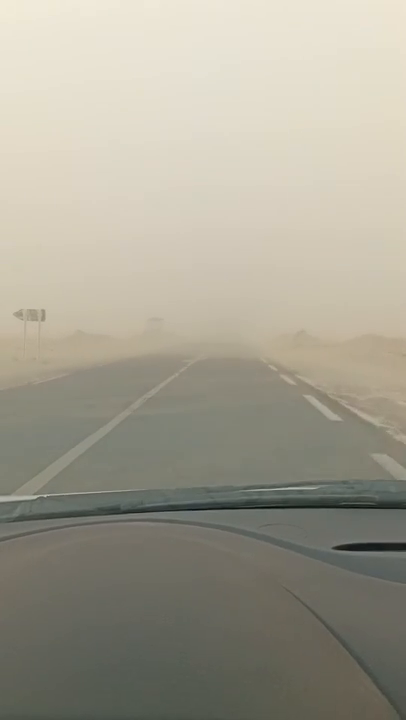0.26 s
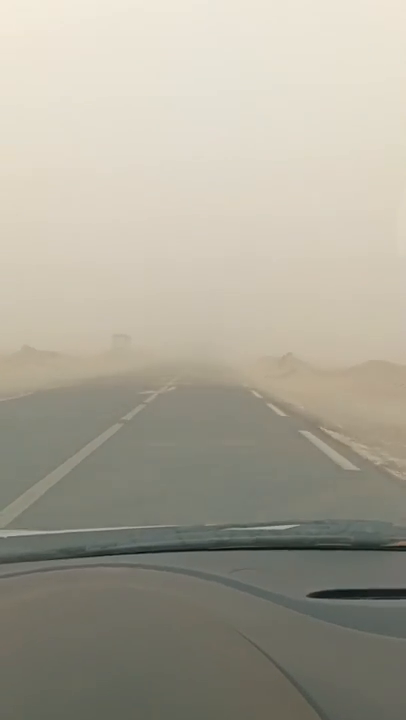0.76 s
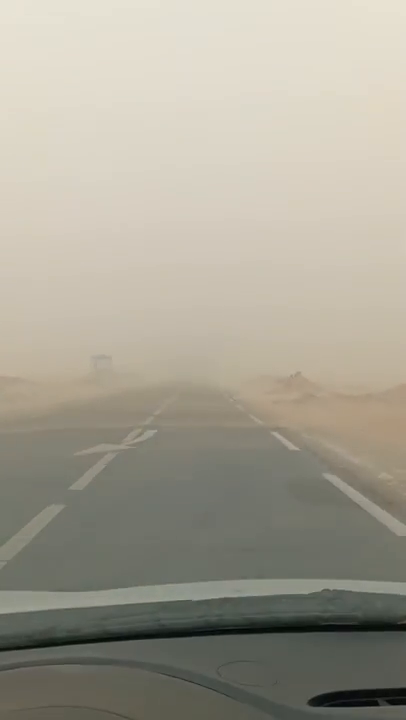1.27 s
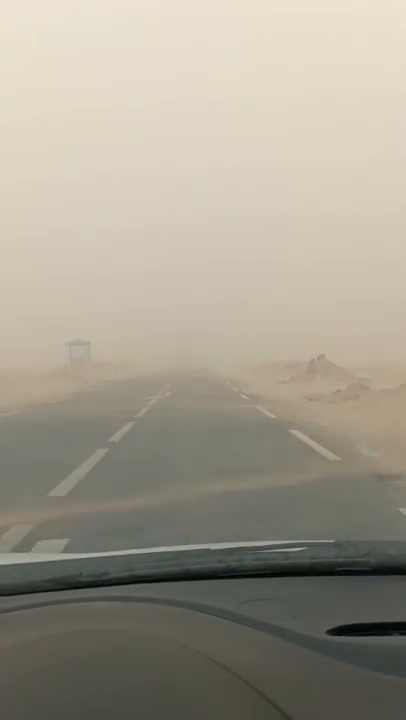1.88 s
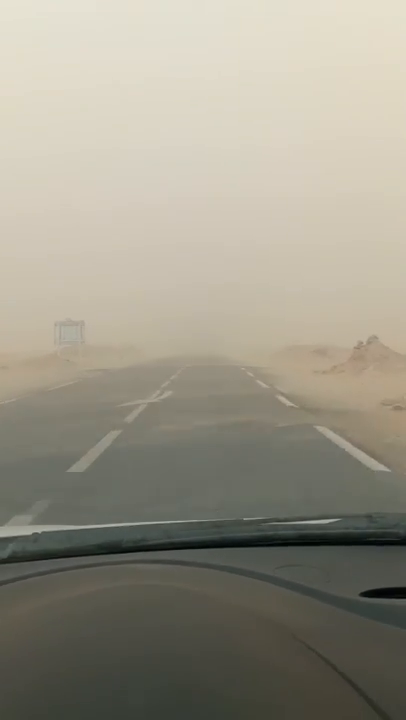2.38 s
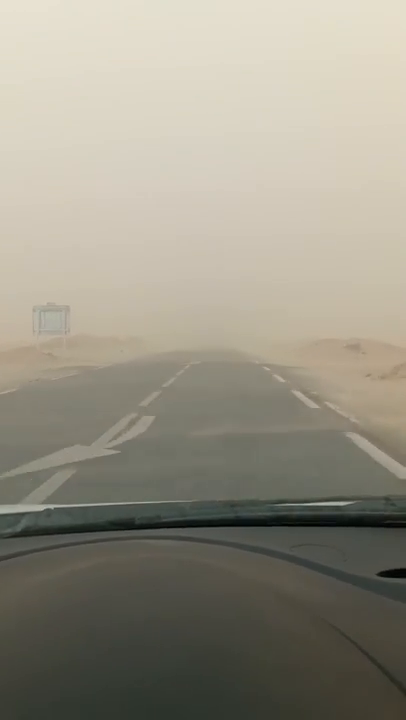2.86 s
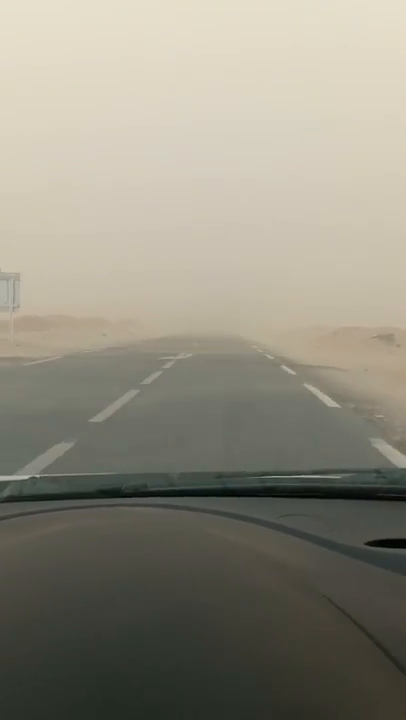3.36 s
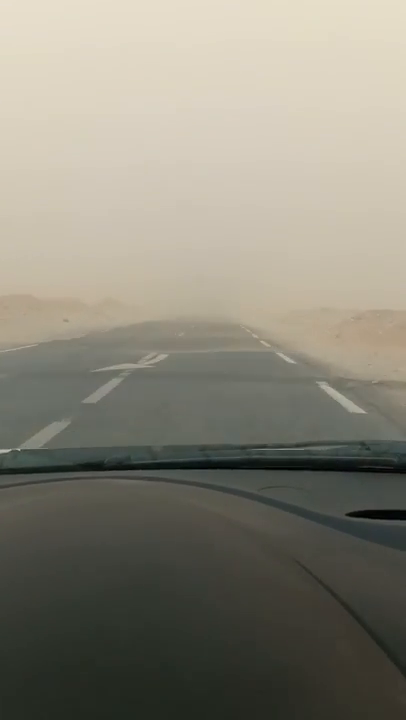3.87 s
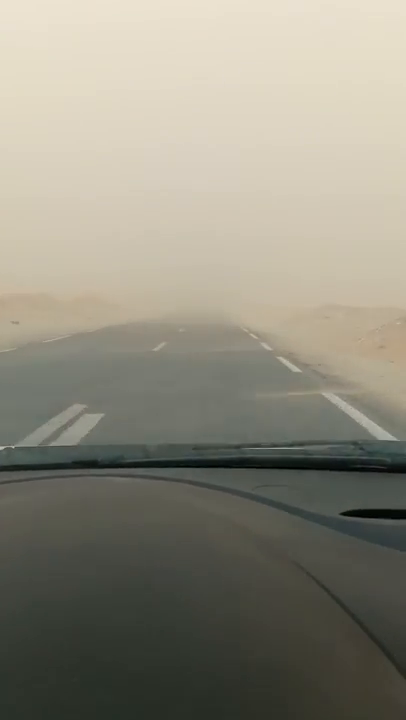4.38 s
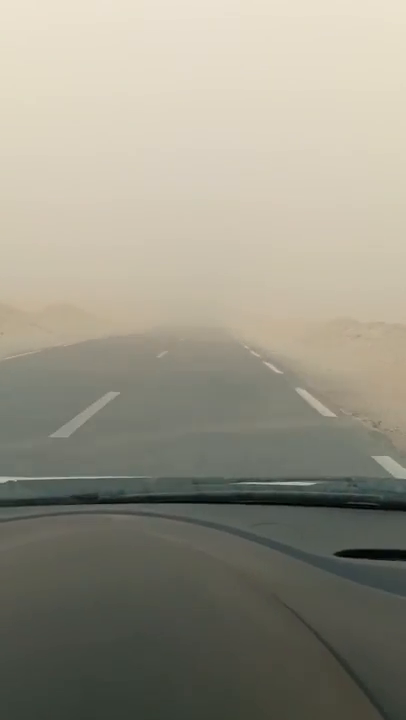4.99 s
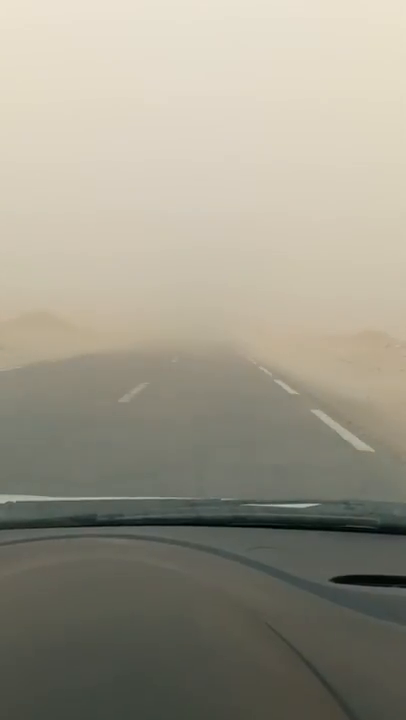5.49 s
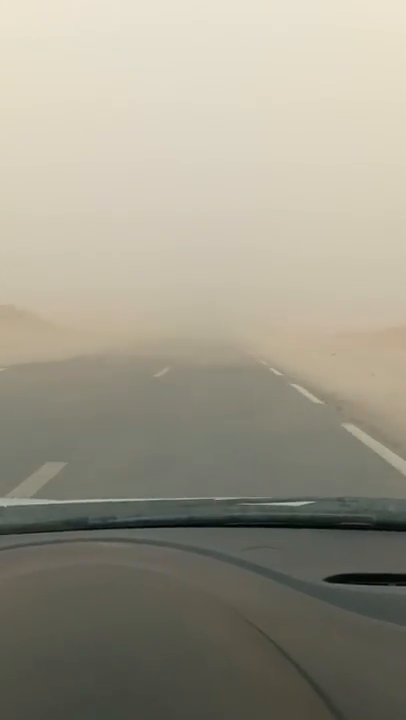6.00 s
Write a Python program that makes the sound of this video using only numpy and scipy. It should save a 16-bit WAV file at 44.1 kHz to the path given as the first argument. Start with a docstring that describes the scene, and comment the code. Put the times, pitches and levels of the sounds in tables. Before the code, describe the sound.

A steady drive through blowing sand, captured in the closed cabin near the dash. Heavy low tyre and body rumble runs throughout over a faint, swelling engine drone. Bumps knock underneath in ones and bunches, followed by softer rear-axle thumps. Above, quieter air rush and grainy hiss surge and ebb, with sparse ticks of grit on the windscreen, brief dashboard clicks and one very faint seal whistle early on.

```python
"""Low rumble and engine boom inside a car in a sandstorm: rough asphalt drives noise through body and cabin modes.
Wheels thud over bumps and slap across patches, front axle then rear; plastic trim snaps in damped modes.
Rushing air is shaped noise; sand is random grains plus noise, hissing on the glass in gusts.
Coarser grit pings in short bursts, a panel hums, and a seal whistles once."""
import sys
import numpy as np
from scipy.fft import rfft, irfft, next_fast_len
from scipy.io import wavfile
from scipy.ndimage import map_coordinates

SR = 44100
rng = np.random.default_rng(int(sys.argv[2]) if len(sys.argv) > 2 else 0)


def store_pcm(level_fs):
    """Save levels as 16-bit WAV."""
    pcm = np.round(np.clip(level_fs, -1, 1) * 32767).astype(np.int16)
    wavfile.write(sys.argv[1], SR, np.atleast_2d(pcm).T)


N = 275625

# Bumps in the road. Each row: start in seconds, front thud in relative dB, rear thud in relative dB,
# front pitch in Hz.
BUMP_HITS = [(0.216, -14.5, -29, 114), (0.352, -17.5, -31.5, 107), (0.571, -14.5, -21, 120),
             (0.604, -19, -30, 103), (0.634, -19, -37, 139), (1.007, -19.5, -32.5, 105.4),
             (1.552, -21, -30.5, 145.7), (1.58, -14, -27, 116.7), (1.608, -28, -18, 108.7),
             (1.905, -22.5, -25, 126.4), (2.24, -13, -21, 127.7), (2.312, -33, -20, 116.7),
             (2.446, -16.5, -33, 106), (2.49, -19.5, -20.5, 106), (2.565, -17, -29.5, 119),
             (3.202, -14.5, -23, 115.6), (3.24, -20, -29, 95), (3.345, -13.5, -32, 106),
             (3.369, -15, -30.5, 117), (3.728, -18.5, -30, 133.6), (4.054, -17, -27.5, 110.4),
             (4.474, -13.5, -19, 137), (4.524, -15, -19.5, 135), (4.555, -22.5, -21.5, 98.3),
             (4.66, -18, -33.5, 148), (5.651, -18, -26.5, 129), (5.689, -12.5, -20, 119),
             (6.062, -19, -23.5, 150)]
# Body rumble spectrum. Each row: frequency in Hz, relative density in dB per Hz.
BODY_SPECTRUM = [(15, -49), (25, -38), (32, -4), (50, 1.5), (75, -3), (100, -3), (140, -1.5), (180, -3),
                 (205, -8.5), (270, -13.5), (400, -27.5), (900, -86.5)]
# Plastic trim spectrum. Each row: frequency in Hz, relative density in dB per Hz.
PLASTIC_SPECTRUM = [(250, -7.5), (600, 9.5), (1100, -2), (1700, 13), (3200, 8.5), (4200, -14), (5500, -5),
                    (8000, -47), (15000, -29.5)]
# Struck glass spectrum. Each row: frequency in Hz, relative density in dB per Hz.
GLASS_SPECTRUM = [(1000, -30), (2100, -4.5), (3100, -17.5), (4100, 3.5), (5400, 10), (6400, -0.5),
                  (8000, -14), (10000, -18), (12500, -14), (14000, -10.5), (16000, -19)]


def amp(db):
    """Decibels to gain."""
    return 10 ** (np.asarray(db) / 20)


def unit(x):
    """Scale to rms 1."""
    return x / np.sqrt(np.mean(x ** 2) + 1e-20)


def noise(size=N):
    """Two unrelated channels of white noise."""
    return rng.standard_normal((2, size))


def along(points, hz):
    """(Hz, value) points read on a log-frequency axis."""
    f, v = np.transpose(points)
    return np.interp(np.log(hz + 1), np.log(f + 1), v)


def curve(rows):
    """(s, value) points read at every sample."""
    s, v = np.transpose(rows)
    return np.interp(np.arange(N) / SR, s, v)


def wobble(knots_per_s):
    """Smooth random curve through 1000 normal knots, mirrored beyond them."""
    knots = rng.standard_normal(1000)
    return map_coordinates(knots, [np.arange(N) * knots_per_s / SR], mode="mirror")


def filtered(x, response):
    """x through a response given as a function of Hz."""
    size = x.shape[-1]
    m = next_fast_len(size + 8192)
    return irfft(rfft(x, m) * response(np.fft.rfftfreq(m, 1 / SR)), m)[..., :size]


def coloured(x, spectrum):
    """x shaped by (Hz, dB) points."""
    return filtered(x, lambda hz: amp(along(spectrum, hz)))


def in_cabin(pair):
    """Two unrelated signals become left and right: long waves reach both alike, short ones do not."""
    # Left-right likeness. Each row: frequency in Hz, correlation from 0 to 1.
    likeness = [(60, 0.93), (160, 0.99), (270, 0.85), (450, 0.85), (740, 0.08), (1200, 0.1), (2000, 0)]
    # Stereo balance. Each row: frequency in Hz, left minus right gain in dB.
    balance = [(60, 1.6), (120, -0.5), (200, -0.5), (270, -5), (400, -3), (500, -6), (640, 0.5), (870, 1.5),
               (1100, 1), (1800, 5), (4000, 4), (5000, -0.5), (5800, 5), (15000, 2)]

    def mid_side(hz):
        turn = np.arccos(np.clip(along(likeness, hz), -1, 1)) / 2
        return np.array([np.cos(turn), np.sin(turn)])

    mid, side = filtered(pair, mid_side)
    left_right = np.array([mid + side, mid - side])
    return filtered(left_right, lambda hz: amp(np.outer([.5, -.5], along(balance, hz))))


def add(track, s, sound):
    """Mix a sound into a track at time s."""
    part = track[..., max(round(s * SR), 0):][..., :sound.shape[-1]]
    part += sound[..., :part.shape[-1]]


def bursts(events, spectrum, attack_s, t60_s, echo_db, echo_t60_s):
    """Each contact is shaped noise, standing for dense damped modes, plus a second decay for the cabin."""
    track, t = np.zeros((2, N)), np.arange(SR // 5) / SR
    decay = amp(-60 * t / t60_s) + amp(echo_db - 60 * t / echo_t60_s)
    shape = (1 - np.exp(-t / attack_s)) * decay
    crest = np.sqrt(np.mean(shape ** 2)) / shape.max()
    for s, db, tilt_db_per_octave in events:
        def colour(hz):
            return amp(along(spectrum, hz) + tilt_db_per_octave * np.log2(np.maximum(hz, 100)))

        modes = filtered(noise(len(t)), colour)
        add(track, s, amp(db) * unit(modes * shape) * crest)
    return in_cabin(track)


def swells(events, rest_db, rise_share, fall_db_per_s):
    """Level in dB: each (start, length, dB) event builds over a share of its length, holds, dies away."""
    t = np.arange(N) / SR
    power = amp(rest_db) ** 2
    for s, length_s, db in events:
        attack = np.sin(np.pi / 2 * np.clip((t - s) / (rise_share * length_s), 0, 1)) ** 2
        release_db = fall_db_per_s * np.maximum(t - s - length_s, 0)
        power = power + (attack * amp(db - release_db)) ** 2
    return 10 * np.log10(power)


def strays():
    """Single grains tap faintly on the glass at random times, also between gusts."""
    taps_per_s, level_db, spread_db = 31, -64, 1.5  # spread either way
    draws = rng.random((int(taps_per_s * N / SR), 2))
    taps = [(when * N / SR, level_db + spread_db * (2 * size - 1), 0) for when, size in draws]
    return bursts(taps, GLASS_SPECTRUM, attack_s=0.00016, t60_s=0.022, echo_db=-6.5, echo_t60_s=0.087)


def whistle():
    """Air forced through a door seal gives a thin, unsteady tone, wavering separately in each channel."""
    # Whistles. Each row: start in seconds, length in seconds, relative peak in dB.
    whistle_spells = [(1.42, 0.13, -56.5)]
    pitch_hz, waver_hz = 5700, 110
    level_db = swells(whistle_spells, rest_db=-92, rise_share=1.0, fall_db_per_s=200)
    hz = pitch_hz + waver_hz * np.array([wobble(400), wobble(400)])
    phase = 2 * np.pi * np.cumsum(hz, axis=1) / SR
    return in_cabin(amp(level_db + 2.5 * wobble(70)) * unit(np.sin(phase)))


def hum():
    """A wavering body hum comes and goes; the tread adds a faint, unsteady note."""
    # Panel hum. Each row: start in seconds, length in seconds, relative peak in dB.
    hum_spells = [(-0.1, 0.39, -28), (5.38, 0.33, -28.5)]
    hum_db = swells(hum_spells, rest_db=-39, rise_share=0.48, fall_db_per_s=114.5)

    def waver(hz, spread_hz, knots_per_s):
        return unit(np.sin(2 * np.pi * np.cumsum(hz + spread_hz * wobble(knots_per_s)) / SR))

    panel = amp(hum_db - 4.5 + 0.47 * wobble(3.7)) * waver(168.9, spread_hz=2.675, knots_per_s=18)
    tread = amp(-55.0 + 3.2 * wobble(24)) * waver(875.6, spread_hz=19, knots_per_s=60)
    return in_cabin(np.array([panel + tread, np.zeros(N)]))


def grit():
    """Coarse grit cracks on the glass at contact, then the pane pings briefly."""
    # Hits. Each row: start in seconds, relative level in dB, brightness in dB per octave.
    grit_hits = [(0.174, -51, 0), (0.622, -47.5, -1), (0.657, -49, 0.5), (0.6689, -42.5, -3),
                 (0.6806, -31.5, 1), (0.6954, -44.5, 3), (0.7572, -45.5, -5), (1.3406, -49, -6),
                 (1.3783, -45.5, -1.5), (1.4047, -47, -1.5), (1.4187, -40.5, -4.5), (2.455, -51.5, 7),
                 (2.9674, -45.5, -0.5), (3.5114, -51, 1), (3.9355, -47, 1), (3.956, -41, -6.5),
                 (3.994, -34, -0.5), (4.14, -40.5, -7.5), (4.6536, -48, 6), (5.0506, -31.5, -1),
                 (5.0729, -43, -3), (5.091, -45.5, -1.5), (5.8328, -46.5, 4), (6.0721, -46, -5),
                 (6.241, -38.5, 1)]
    # Contact spectrum. Each row: frequency in Hz, relative density in dB per Hz.
    crack_spectrum = [(2500, -17), (4500, 6), (7000, -5.5), (10000, -8.5), (13500, -5), (16000, -11)]
    ping = bursts(grit_hits, GLASS_SPECTRUM, attack_s=.0002, t60_s=.018, echo_db=-17, echo_t60_s=.12)
    crack = bursts(grit_hits, crack_spectrum, attack_s=.0001, t60_s=.004, echo_db=-40, echo_t60_s=.03)
    return amp(-3) * ping + amp(-17) * crack


def trim():
    """Plastic trim snaps as the body flexes, rings in damped modes and scatters round the cabin."""
    # Snaps. Each row: start in seconds, relative level in dB, brightness in dB per octave.
    trim_snaps = [(0.6482, -36, 2), (0.6805, -30.5, 7), (1.7644, -33.5, 0), (1.7666, -36.5, -1.5),
                  (3.3986, -26, 1.5), (3.4013, -24.5, -9.5), (3.4216, -33, -8), (3.7369, -40, -1),
                  (4.13, -40, 7), (4.5444, -45, -4.5), (4.651, -35.5, -6.5), (4.678, -39, -2),
                  (5.0542, -38.5, 1.5), (5.8658, -36, 1.5), (5.8703, -38, -1.5), (6.2393, -33.5, -0.5)]
    # Dashboard modes. Each row: nominal frequency in Hz, nominal level in dB, t60 in seconds.
    trim_modes = [(675, -9.5, 0.025), (910, 0, 0.02), (1380, -8.5, 0.02), (1680, -8.5, 0.0095),
                  (2150, -4.5, 0.015), (2790, -1, .011), (3046, -5, 0.0062), (3760, -13.5, 0.01)]
    contact_s = 0.0001
    pan_db, lag_s = 12, 0.00055  # louder and earlier on the left
    snaps, t = np.zeros((2, N)), np.arange(SR // 20) / SR
    hz, level_db, t60_s = np.transpose(trim_modes)[:, :, None]
    half_turns = np.arange(len(hz))[:, None] / 2  # alternate modes start inverted
    for s, db, tilt_db_per_octave in trim_snaps:
        detune, scatter_db = rng.standard_normal((2, len(hz), 1))
        cycles = hz * (1 + 0.033 * detune) * t + half_turns
        mode_db = level_db + tilt_db_per_octave * np.log2(hz) + scatter_db - 60 * t / t60_s
        ring = (amp(mode_db) * np.sin(2 * np.pi * cycles)).sum(0)
        ring = ring * (1 - np.exp(-t / contact_s)) ** 2
        ring = amp(db) * ring / np.abs(ring).max()
        add(snaps[0], s, amp(pan_db / 2) * ring)
        add(snaps[1], s + lag_s, amp(-pan_db / 2) * ring)
    scattered = bursts(trim_snaps, PLASTIC_SPECTRUM, attack_s=.0003, t60_s=.024, echo_db=-20, echo_t60_s=.08)
    return amp(-1.5) * snaps + amp(-5) * scattered


def storm():
    """Air rushes round the car; stronger gusts throw more grains at the glass, with a fizz of fine dust."""
    # Sand hiss. Each row: time in seconds, relative level in dB.
    sand_flow = [(0, -66), (0.14, -65), (0.2, -59.5), (0.36, -65.5), (0.55, -71), (0.68, -52),
                 (0.73, -60.5), (0.79, -62.5), (0.85, -51.5), (1.02, -53.5), (1.12, -68), (1.31, -69),
                 (1.39, -63), (1.42, -57), (1.49, -55.5), (1.58, -52), (1.78, -55), (1.84, -66.5),
                 (2.27, -58.5), (2.55, -72), (2.94, -71), (2.97, -56), (3.04, -63), (3.2, -55.5),
                 (3.36, -58.5), (3.47, -64), (3.7, -61), (3.92, -67), (3.99, -51.5), (4.07, -68.5),
                 (4.135, -53.5), (4.2, -65.5), (4.33, -55.5), (4.6, -69.5), (4.76, -66), (4.98, -67),
                 (5.0, -58.5), (5.09, -55.5), (5.15, -61.5), (5.19, -68), (5.68, -75), (5.84, -54),
                 (6.02, -52.5), (6.25, -57.5)]
    # Rushing air. Each row: time in seconds, relative level in dB.
    air_rush = [(0, -56), (0.45, -55), (0.65, -50.5), (0.9, -50.5), (1.3, -53.5), (1.48, -58),
                (1.72, -55.5), (1.9, -54.5), (2.4, -52.5), (2.88, -56.5), (3.2, -54.5), (3.55, -54),
                (4.45, -52.5), (4.85, -55.5), (5.45, -57.5), (5.9, -53.0), (6.25, -53)]
    # Dust fizz. Each row: time in seconds, level in dB re the hiss.
    dust_levels = [(0.2, -15.5), (0.65, -21.5), (0.92, -21), (1.3, -12), (1.5, -10), (1.68, -11.5),
                   (2.3, -14), (3.2, -17), (3.7, -15), (4.3, -18), (5.0, -9.5), (5.4, -18), (6.0, -9)]
    # Squalls that strike the car. Each row: start in seconds, length in seconds, relative peak in dB.
    squalls = [(1.6, 0.053, -47.5), (3.13, 0.08, -47.5)]
    # Spectra of air, sand and dust. Each row: frequency in Hz, relative density in dB per Hz.
    air_spectrum = [(400, -3.5), (1200, -3.5), (2000, 4.5), (2750, 0.5), (3300, -11), (4000, -6),
                    (4600, -20), (5200, -9), (6300, -22), (8000, -31), (10000, -33), (14000, -26),
                    (16000, -33)]
    sand_spectrum = [(600, -16.5), (1500, -2), (2600, 8), (3300, 1), (4500, 3.5), (5300, 4.5), (6400, -6),
                     (7800, -15.5), (9000, -17), (9700, -21.5), (11300, -24), (12500, -16), (13600, -24.5),
                     (15600, -26.5)]
    fizz_spectrum = [(3000, -33.5), (5300, 1.5), (7800, -4), (9700, -14), (11300, 2), (12800, -19),
                     (13500, 7.5), (15600, 2)]
    sand_db = curve(sand_flow)
    air_db = swells(squalls, curve(air_rush), rise_share=1, fall_db_per_s=132)
    air = amp(air_db - 1.5 + 1.1 * wobble(5.4)) * unit(coloured(noise(), air_spectrum))
    grains_per_s = 2500 * amp(sand_db - sand_db.mean())
    landing = rng.random((2, N)) < grains_per_s / SR
    grains = landing * noise() / np.sqrt(grains_per_s)  # even power, changing density
    spray = unit(grains) + amp(-2) * noise()
    fizz = amp(curve(dust_levels)) * unit(coloured(spray, fizz_spectrum))
    hiss = unit(coloured(spray, sand_spectrum)) + fizz
    return in_cabin(air + amp(sand_db + 1.5 + 0.71 * wobble(30)) * hiss)


def engine():
    """Even firing booms in the cabin, which passes little but the firing rate and its octave."""
    # Boom, louder under load. Each row: time in seconds, relative level in dB.
    engine_load = [(0.0, -35.5), (1.3, -49), (2.5, -35), (4.3, -40), (4.8, -40), (5.9, -29.5), (6.25, -39)]
    firing_hz = 61.7
    phase = 2 * np.pi * np.cumsum(firing_hz + 0.2 * wobble(2.29)) / SR
    tone = unit(np.sin(phase) + amp(-7.0) * np.sin(2 * phase))
    boom = amp(curve(engine_load) + 1.7 * wobble(6.5)) * tone
    return in_cabin(np.array([boom, np.zeros(N)]))


def road():
    """Asphalt grain shakes body and cabin air, harder after bumps; loose trim buzzes and the tread roars."""
    # Tyre roar. Each row: time in seconds, relative level in dB.
    roar_levels = [(0.0, -39.5), (2.6, -40), (3.4, -39.5), (4.2, -41.5), (4.6, -39.5), (5.15, -42),
                   (5.8, -39), (6.25, -38.5)]
    # Cabin resonances. Each row: frequency in Hz, width in Hz, gain in dB.
    cabin_modes = [(56.6, 5.6, -0.5), (110.9, 15.4, 2.5), (172.8, 11.9, -2), (230.9, 18, 0)]
    # Tyre spectrum. Each row: frequency in Hz, relative density in dB per Hz.
    tyre_spectrum = [(100, -19), (250, -3), (330, -2), (380, 3.5), (450, -3.5), (600, -3.5), (790, -8.5),
                     (870, -8), (930, -10), (1080, -11.5), (1200, -18), (1700, -24), (3000, -38),
                     (7000, -61.5)]
    rumble_over_roar_db = 5
    shudder_db, shudder_s = -29.5, 0.11  # level re the front thud, hold
    buzz_db, buzz_db_per_rumble_db = -69.5, 1.7
    roar_db = curve(roar_levels)
    shudders = [(s, shudder_s, db + shudder_db) for s, db, _, _ in BUMP_HITS]
    rumble_db = swells(shudders, roar_db + rumble_over_roar_db, rise_share=0.074, fall_db_per_s=67)

    def cabin_response(f):
        total = 0
        for k, (centre, width, db) in enumerate(cabin_modes):
            damping = 1j * f * width
            total = total + (-1) ** k * amp(db) * damping / (centre ** 2 - f * f + damping)
        return total

    shake = unit(coloured(noise(), BODY_SPECTRUM))
    drone = unit(filtered(coloured(noise(), BODY_SPECTRUM), cabin_response))
    body = amp(rumble_db) * (amp(-1.4) * shake + amp(0.4) * drone)
    roar = amp(roar_db + 1.11 * wobble(40)) * unit(coloured(noise(), tyre_spectrum))
    buzz_level_db = buzz_db + buzz_db_per_rumble_db * (rumble_db - rumble_db.mean())
    buzz = amp(buzz_level_db) * unit(coloured(noise(), PLASTIC_SPECTRUM))
    return in_cabin(body + roar + buzz)


def bumps():
    """Each axle in turn thuds over a bump, jolting the panels for a few cycles, and slaps across a patch."""
    # Asphalt patches. Each row: start in seconds, front slap in relative dB, rear slap in relative dB,
    # brightness in dB per octave.
    patches = [(0.152, -34, -32.5, -9), (0.566, -29.5, -36, -2), (0.587, -27, -31.5, -7.5),
               (1.557, -24, -28.5, -5.5), (1.597, -30, -25, -14), (2.238, -27.5, -30, 5),
               (2.446, -30, -26.5, -8.5), (2.505, -30.5, -39, -8), (2.662, -27, -30.5, 4.5),
               (3.237, -32, -26.5, -3.5), (4.52, -36.5, -40.5, 5), (5.655, -31, -37.5, 6),
               (5.692, -30.5, -28.5, -9)]
    # Slap spectrum. Each row: frequency in Hz, relative density in dB per Hz.
    slap_spectrum = [(150, -24.5), (350, 2.5), (550, 6), (720, 6), (850, -6), (1100, -18), (3000, -66)]
    axle_gap_s = .161  # wheelbase over speed
    rear_pitch_ratio = 0.61
    overtone_hz, overtone_db = 172.8, -10.5  # higher panel mode
    peak_s = 0.016
    track, t = np.zeros((2, N)), np.arange(SR // 5) / SR
    age = t / peak_s
    swell = (age * np.exp(1 - age)) ** 2

    def tone(hz):
        return np.sin(2 * np.pi * (hz * t + rng.random()))

    for start, front_db, rear_db, pitch_hz in BUMP_HITS:
        front_hit = (start, front_db, pitch_hz)
        rear_hit = (start + axle_gap_s, rear_db, pitch_hz * rear_pitch_ratio)
        for s, db, hz in (front_hit, rear_hit):
            thud = tone(hz) + amp(overtone_db) * tone(overtone_hz)
            panels = unit(coloured(noise(len(t)), BODY_SPECTRUM))
            jolt = amp(-4.0) * np.outer([1, 0], thud) + amp(-11.5) * panels
            add(track, s, amp(db) * swell * jolt)
    front = [(s, db, tilt) for s, db, _, tilt in patches]
    rear = [(s + axle_gap_s, db, tilt) for s, _, db, tilt in patches]
    slaps = bursts(front + rear, slap_spectrum, attack_s=0.0031, t60_s=0.17, echo_db=-19.5, echo_t60_s=0.078)
    return in_cabin(track) + amp(-6.5) * slaps


def scene():
    """Sum of all sources inside the car."""
    faint = strays() + whistle() + hum()
    weather = grit() + storm()
    return faint + weather + trim() + engine() + road() + bumps()


def record(dry):
    """Band limit: nothing is kept from top_hz up."""
    top_hz = 15700
    return filtered(dry, lambda hz: hz < top_hz)


dry = scene()
out = record(dry)
store_pcm(out)
```